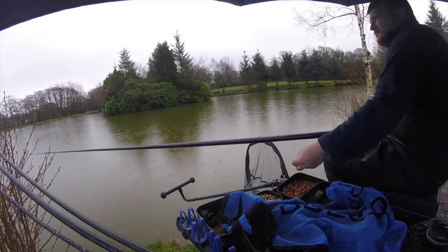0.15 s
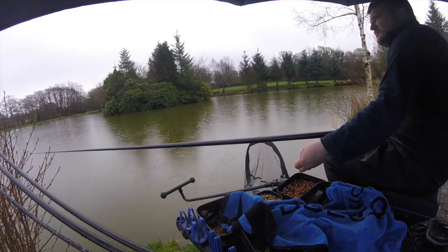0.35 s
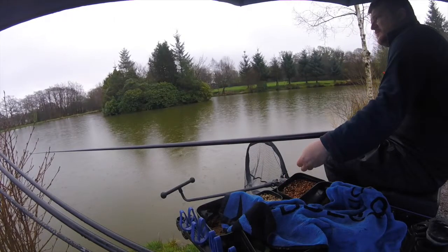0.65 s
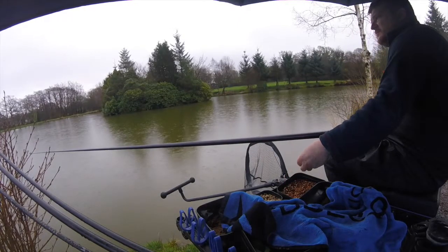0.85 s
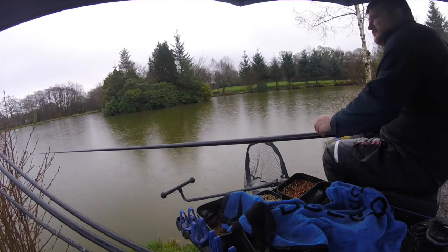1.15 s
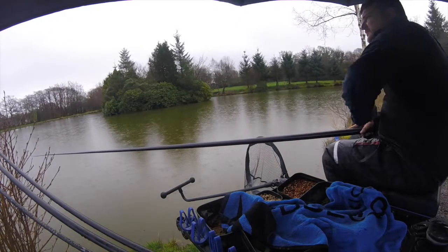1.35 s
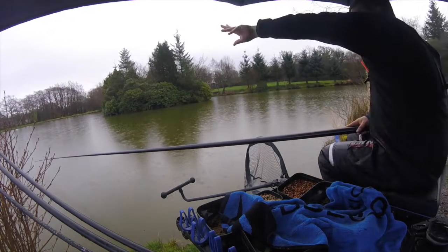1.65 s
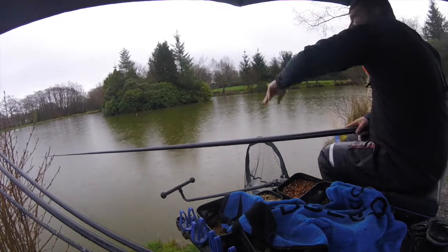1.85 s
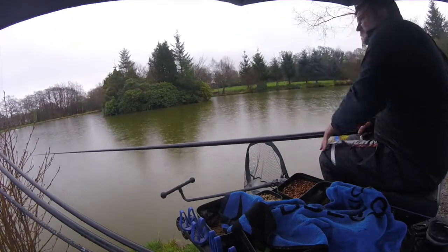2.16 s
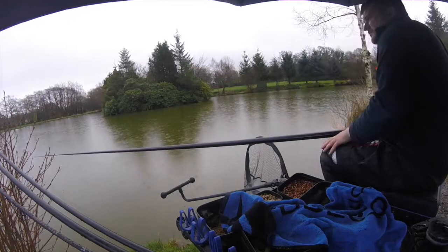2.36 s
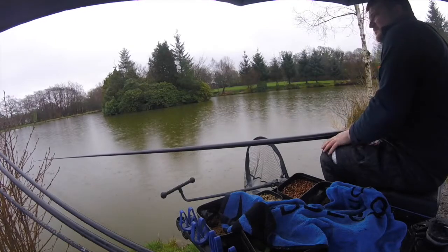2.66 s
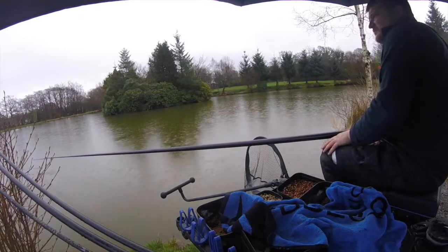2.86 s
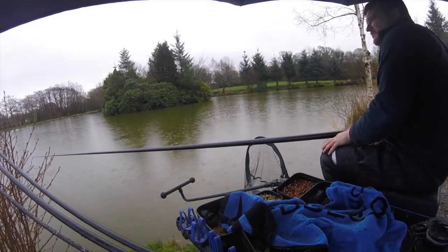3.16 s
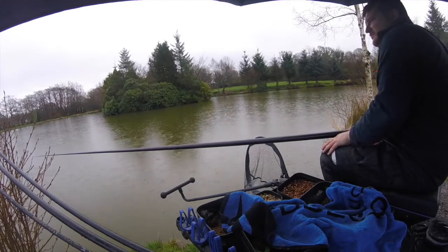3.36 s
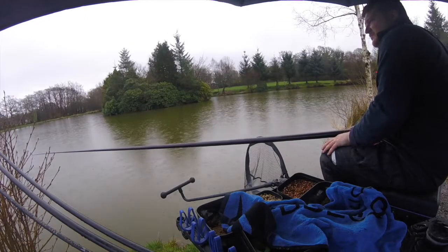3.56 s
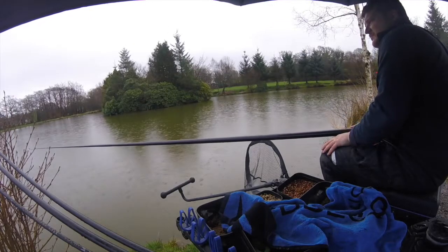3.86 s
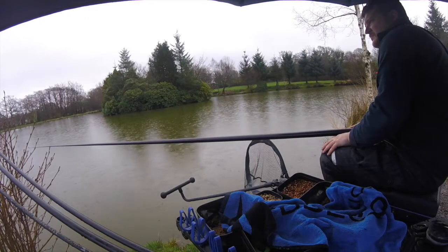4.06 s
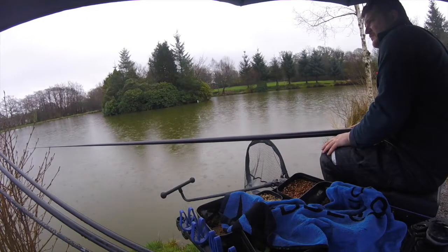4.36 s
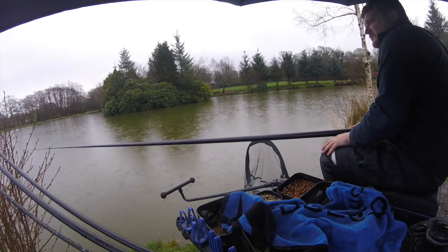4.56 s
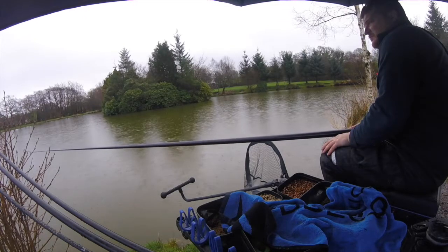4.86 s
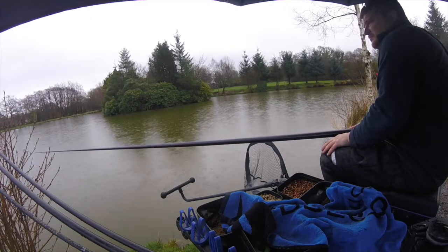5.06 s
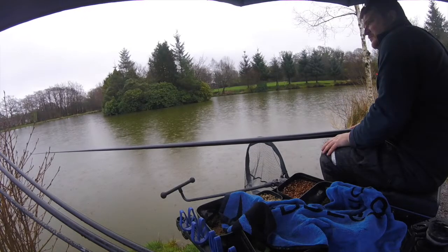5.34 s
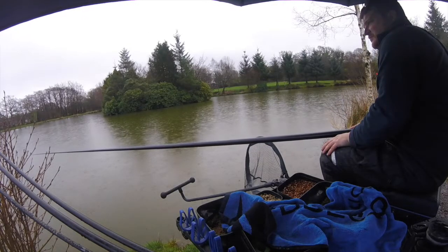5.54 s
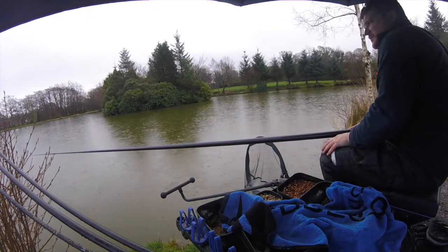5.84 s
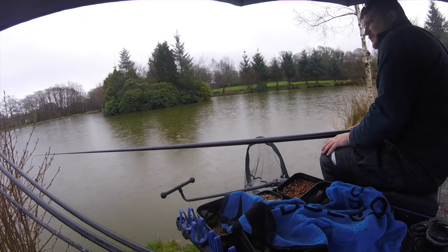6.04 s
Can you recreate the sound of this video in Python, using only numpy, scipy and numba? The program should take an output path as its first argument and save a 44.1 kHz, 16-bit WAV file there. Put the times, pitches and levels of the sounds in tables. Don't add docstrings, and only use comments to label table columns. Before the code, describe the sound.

Under an umbrella beside a lake, steady rain hisses widely and patters on taut cloth, with close drops ringing and spraying. A finch further off to the left sings fast runs of ticks, chips and hoarse dipping notes. Around four to five seconds the rain sinks away and returns as a near bird, almost ahead, repeats piercing phrases with woodland echo. Stereo microphone just below the cloth.

```python
import sys
import numpy as np
from scipy import signal
from scipy.fft import rfft, irfft, next_fast_len
from scipy.io import wavfile
from scipy.ndimage import uniform_filter1d
from numba import njit

SR = 44100
rng = np.random.default_rng(int(sys.argv[2]) if len(sys.argv) > 2 else 0)


def store_wav(level_fs):
    pcm = np.round(np.clip(np.atleast_2d(level_fs), -1, 1) * 32767)
    wavfile.write(sys.argv[1], SR, pcm.T.astype(np.int16))


def how_loud(loudness_db):
    steps = np.asarray(loudness_db, float) / 20
    return 10 ** steps


N = 273420


def level(x, db):
    return x * how_loud(db) / np.sqrt(np.mean(x ** 2))


def curve(table):
    s, *columns = np.transpose(table)
    return [np.interp(np.arange(N) / SR, s, column) for column in columns]


def at(table, hz):
    table_hz, values = np.transpose(table)
    return np.interp(np.log(hz), np.log(table_hz), values)


def pan(db):
    return how_loud(np.array([db, -db]) / 2)


def walk(rate):
    hold = int(SR / rate)
    steps = np.repeat(rng.standard_normal(N // hold + 1), hold)
    return uniform_filter1d(steps, hold)[:N]


def band(x, hz, octaves):
    size = next_fast_len(N)
    f = np.arange(size // 2 + 1) * SR / size + 1
    bell = np.exp(-(np.log2(f / hz) / octaves) ** 2)
    return irfft(rfft(x, size) * bell, size)[..., :N]


def tail(x, t60, gap=0., sparkle=0., flat=False):
    size = SR // 4
    t = np.arange(size) / SR
    decay_db = -60 * np.maximum(t - gap, 0) / t60 + sparkle * walk(150)[:size]
    h = rng.standard_normal((2, size)) * how_loud(decay_db) * (t >= gap)
    if flat:
        spectrum = rfft(h)
        h = irfft(spectrum / uniform_filter1d(np.abs(spectrum), size=5), size) * (t < t60)
    h = h / np.sqrt(np.sum(h ** 2, axis=1, keepdims=True))
    return signal.oaconvolve(x, h, axes=1)[:, :N]


def fade():
    t = np.arange(N) / SR
    out = np.sin(np.interp(t, (2.48, 4.91), [0, np.pi / 2])) ** 2
    back = np.sin(np.interp(t, (4.833, 5.29), [0, np.pi / 2])) ** 2
    return 1 - out + back + how_loud(-50)


# start_s, length_s, level_db
HUM = [
    (0.498, 0.4, -84.5),
    (1.096, 0.57, -90),
    (2.381, 1.1, -83.5),
    (5.397, 0.11, -93),
    (5.776, 0.46, -93),
]


def pump_load():
    idle_db, ramp_s = -92, 0.068
    t = np.arange(N) / SR
    load = how_loud(idle_db)
    for start, length, db in HUM:
        inside = np.minimum(t - start, start + length - t)
        load = load + how_loud(db) * np.clip(inside / ramp_s + 1, 0, 1)
    return load * fade()


def pump():
    hz = 89 + 2.3 * walk(8.0)
    return np.sin(2 * np.pi * np.cumsum(hz) / SR) * pump_load() * how_loud(1.5)


# start_s, level_db
CHORUS = [
    (3.6, -63),
    (4.572, -71.5),
    (5.1, -63.5),
]


def far_chorus():
    smear = band(rng.standard_normal((2, N)), 3240, 0.48)
    heard = np.interp(np.arange(N) / SR, [4.0, 4.45, 4.9, 5.05], [0, 1, 1, 0])
    return level(smear, -0.13) * how_loud(curve(CHORUS)[0] + 2.0 * walk(37)) * heard


# pitch_hz, level_db (per Hz)
HISS = [(18, -40), (36, -10), (88, -24), (140, -21.5), (505, 3), (546, -3.5), (945, -4.5), (1770, -5),
        (2420, 1), (2910, -0.5), (7650, -12), (12300, -5), (15500, -26)]
# pitch_hz, side_minus_mid_db
SIDES = [(60, -4), (110, -3), (200, -1.5), (380, -7.5), (700, 1.5), (1290, 2), (2380, -3.5), (4400, -0.5),
         (8120, 0.5), (15000, 2.5)]
# pitch_hz, left_minus_right_db
LEAN = [(60, 2), (110, 0.5), (200, -4.5), (380, -6), (700, -4), (1290, -9.5), (2380, -3.5), (4400, 2.5),
        (8120, 0), (15000, 2)]


def hiss(treble_db):
    out, low, high = 0, walk(18), walk(10)
    for hz in 32 * 2 ** np.arange(0, 9.1, .5):
        mid, side = band(rng.standard_normal((2, N)), hz, 0.49)
        treble = np.clip(np.log2(hz / 2500) / 3.6, 0, 1)
        db = at(HISS, hz) + treble * treble_db
        db = db + 1.2 * (1 - treble) * low + 2.8 * treble * high + 1.2 * walk(20)
        pair = mid + how_loud(at(SIDES, hz)) * side * np.array([[1], [-1]])
        out = out + how_loud(db) * pair * pan(at(LEAN, hz))[:, None]
    return out


@njit
def grains(s, hz, cycles, left, right):
    out = np.zeros((2, N))
    for k in range(len(s)):
        turn = np.exp((2j * np.pi - np.log(1000) / cycles[k]) * hz[k] / SR)
        z, start = 1 + 0j, int(s[k] * SR)
        for i in range(start, min(N, start + int(cycles[k] / hz[k] * SR))):
            out[0, i] += left[k] * z.imag
            out[1, i] += right[k] * z.imag
            z *= turn
    return out


def patter(count, hz, octaves, cycles, spread_db, pan_db):
    pitch_draw, place_draw = rng.standard_normal((count, 2)).T
    size = how_loud(np.minimum(spread_db * rng.exponential(size=count), 7))
    left, right = size * pan(pan_db * np.clip(place_draw, -1.3, 1.3))
    pitch = np.clip(hz * 2 ** (octaves * pitch_draw), 350, 15000)
    return grains(rng.uniform(0, N / SR, count), pitch, np.full(count, 1. * cycles), left, right)


# start_s, level_db
RAIN = [
    (0.0, -59.5),
    (0.75, -58.5),
    (2.3, -59.5),
    (3.2, -57.5),
    (5.3, -60.5),
    (6.2, -59),
]


def rain():
    db, spray_db = curve(RAIN)[0], 2
    taps = patter(count=3000, hz=1500, octaves=0.63, cycles=5, spread_db=3, pan_db=7)
    ticks = patter(count=3500, hz=8000, octaves=0.75, cycles=11, spread_db=3.5, pan_db=11)
    crisp = patter(count=1800, hz=2800, octaves=0.7, cycles=5.5, spread_db=4, pan_db=7)
    crisp = band(crisp + 0.5 * tail(crisp, .05, flat=True), 2800, 2.2)
    taps = band(taps + 0.35 * tail(taps, 0.093, flat=True), 1760, 2.38) * pan(-0.7)[:, None]
    spray = level(ticks + 1.6 * tail(ticks, 0.063, flat=True), -1.8)
    bed = level(hiss(spray_db), 6.28) + level(taps, 0.057) + level(crisp, -6.0)
    return how_loud(db) * fade() * (bed + how_loud(spray_db) * spray)


def drops(table, cycles, gain_db, pan_db, spray_hz, spray_db, t60, click=1):
    click_hz, click_cycles, click_db = 2630, 2, -1
    s, db, hz = np.transpose(table)
    s = s + 0.00119
    left, right = how_loud(db + gain_db) * pan(pan_db + 0.78 * rng.standard_normal(len(s)))
    hits = grains(s, hz, np.full(len(s), 1. * cycles), left, right)
    touch = np.maximum(hz, click_hz)
    hits = hits + how_loud(click_db) * grains(s, touch, click_cycles * touch / click_hz, left, right) * click
    kicks = np.zeros(N)
    kicks[(s * SR).astype(int)] = how_loud(db + spray_db)
    burst = signal.lfilter([1], [1, -how_loud(-60 / t60 / SR)], kicks) * how_loud(5.47 * walk(500))
    spray = level(band(rng.standard_normal((2, N)), spray_hz, 1.55), 0)
    return hits + burst * spray * pan(pan_db)[:, None]


# start_s, peak_db, ring_hz
TAPS = [(0.127, -40.5, 1750), (0.146, -49, 1890), (0.224, -48.5, 1510), (0.58, -46, 1820),
        (0.621, -50, 1550), (0.888, -41, 1920), (0.977, -44, 1830), (1.184, -44, 1700), (1.292, -47, 1910),
        (1.467, -44.5, 1710), (1.579, -45.5, 1600), (1.689, -44.5, 2060), (1.693, -52, 1510),
        (2.121, -49, 1900), (2.597, -42.5, 1670), (2.731, -48, 1520), (2.84, -41, 1660), (2.964, -46, 1810),
        (3.199, -51, 1748), (3.261, -47.5, 1700), (3.547, -54, 1670), (3.675, -46, 1940),
        (3.748, -50, 2030), (3.885, -56, 1510), (5.096, -44, 1710), (5.563, -42, 2260), (5.631, -40, 1790),
        (5.919, -45.5, 1720), (5.98, -47, 1790), (6.069, -43.5, 1800),
        (0.412, -42, 5100), (1.034, -39.5, 1910), (1.054, -55, 1800), (1.117, -51, 5600),
           (1.974, -49, 1760), (1.997, -47, 1580), (2.065, -43, 1890), (2.151, -46, 1710),
           (2.337, -50, 1490), (2.348, -52, 2300), (2.356, -50, 3600), (2.369, -59, 1320)]
# start_s, peak_db, ring_hz
THUDS = [(0.893, -43.5, 1260), (1.034, -41, 1130), (1.32, -49, 640), (1.46, -52.5, 640), (1.559, -51, 1220),
         (1.824, -50.5, 820), (2.326, -43.5, 674), (2.779, -50, 729), (3.348, -54, 724), (3.68, -55, 1270),
         (5.174, -46.5, 993), (5.421, -45, 651), (5.499, -48, 1130), (6.021, -59, 1230)]
# start_s, peak_db, ring_hz
PATTER = [(0.037, -45, 1080), (0.067, -52, 2510), (0.203, -44, 1700), (0.236, -42, 2830),
          (0.276, -49, 1570), (0.318, -46, 2270), (0.361, -41.5, 1070), (0.417, -42.5, 1770),
          (0.489, -53, 1950), (0.73, -38, 1680), (1.038, -42, 1150), (1.111, -44, 1730), (1.265, -41, 1690),
          (1.332, -45, 2490), (1.437, -52, 2160), (1.587, -42, 1140), (1.7, -43, 2640), (1.771, -48, 2880),
          (1.859, -40, 1820), (1.911, -40.5, 2930), (2.089, -43, 1390), (2.259, -57, 1670),
          (2.331, -48, 1280), (2.342, -47, 1410), (2.362, -48, 1130), (2.377, -51, 2120),
          (2.389, -46.5, 1580), (2.433, -46, 1940), (2.509, -46, 1680), (2.944, -47, 1500),
          (3.044, -42, 2150), (3.065, -51, 1850), (3.119, -53, 1330), (3.311, -50, 1770),
          (3.602, -49, 1510), (3.93, -60, 1360), (3.996, -52.5, 1730), (4.987, -54.5, 2590),
          (5.034, -49, 1120), (5.157, -51, 956), (5.756, -47, 2020), (5.856, -53, 1590), (5.898, -56, 2140),
          (5.938, -45.5, 617), (6.089, -42.5, 865)]
# start_s, peak_db, ring_hz
SPLASHES = [(0.1401, -48, 12800), (0.6694, -38.5, 10200), (0.7706, -48, 12140), (0.8884, -42, 10700),
            (1.0335, -41, 12700), (1.0984, -43.5, 6930), (1.1672, -44, 12300), (1.4353, -39, 6000),
            (1.5549, -43, 13800), (1.9644, -43, 12700), (2.1206, -42, 11800), (2.3504, -46, 7860),
            (2.4513, -38.5, 10700), (2.621, -35.5, 12430), (2.8409, -43, 6760), (3.3139, -43, 12100),
            (3.5733, -45, 11800), (3.7174, -45.5, 7800), (3.9674, -52.5, 12200), (5.1929, -44.5, 6800),
            (5.2398, -43.5, 10500), (5.2922, -41, 12700), (5.356, -45, 7250), (5.4907, -41, 7470),
            (5.5446, -42, 11400), (5.588, -45, 10660), (5.9407, -40.5, 7300), (5.9706, -43, 11900),
            (6.047, -40.5, 6750), (6.1861, -41, 9980),
            (1.458, -45, 11700), (1.7144, -50, 11500), (2.357, -45, 7800), (4.0814, -63, 14700),
         (4.1054, -60, 12200), (4.3564, -68, 12100), (4.4734, -70, 7160), (4.6774, -72, 7160),
         (4.9634, -52.5, 13300), (5.0344, -49, 11600), (5.6904, -44, 12200), (5.9957, -56, 11800)]


def close_drops():
    close = drops(TAPS, 25, 0.94, -3.5, 1800, -8.0, 0.14)
    close = close + drops(THUDS, 11.0, 1.9, -5.0, 1180, -5.0, 0.17)
    close = close + drops(PATTER, 11.3, -3.0, -2.7, 1750, -10.0, 0.1)
    close = close + drops(SPLASHES, 30, .1, 0.71, 12300, -10, 0.16, click=0)
    return signal.sosfilt(signal.butter(2, 300, "high", fs=SR, output="sos"), close)


def whistle(notes, rough_db, glide_db):
    out = np.zeros(N)
    for note in notes:
        s, hz, db = np.transpose(note)
        i = np.arange(int(s[0] * SR), min(N, int(s[-1] * SR)))
        hz = uniform_filter1d(np.interp(i / SR, s, hz), size=60, mode="nearest")
        db = np.interp(i / SR, s, db) + glide_db * np.tanh((np.gradient(hz) / 5) ** 2)
        edge = np.minimum(1, np.minimum(i - i[0], i[-1] - i) / 40)
        out[i] += np.sqrt(2) * edge * how_loud(db) * np.sin(2 * np.pi * np.cumsum(hz) / SR)
    return out * how_loud(rough_db * walk(500))


def sung(song):
    notes = []
    for shape, rows in song:
        for s, pitch, length, db in rows:
            notes.append(np.array(shape) * [length, pitch, 1] + [s, 0, db])
    return notes


# offset_s, pitch_hz, level_db
SEEP = [(0, 5440, -6), (.1, 5460, -2), (.17, 5470, 0), (.29, 5460, -10)]
WHEEZE = [(0, 5950, 2), (.06, 5750, 0), (.16, 5600, -7), (.3, 5550, -11)]
# shape, then rows of start_s, pitch_ratio,
# length_ratio, level_db
FAR = [(SEEP, [(3.37, .998, .95, -66), (3.66, .998, .12, -70), (3.79, .995, .35, -72),
       (4.2, 1.19, .65, -77), (4.45, 1.31, .3, -86), (4.55, .507, 1.2, -79), (4.642, .51, .08, -70),
       (4.714, .51, .08, -70), (4.783, .51, .08, -69)])]
# shape, then rows of start_s, pitch_ratio, length_ratio, level_db
FAR_HOARSE = [(SEEP, [(4.13, 1.215, .55, -67)]), (WHEEZE, [(4.085, 1, 1.1, -75)])]


def far_birds():
    clear = whistle(sung(FAR), 1.5, 0) * how_loud(2.5 * walk(40) - 1)
    hoarse = level(walk(450), 0) * whistle(sung(FAR_HOARSE), 2, 0)
    far = (clear + hoarse) * np.ones((2, 1))
    return .7 * far + .6 * tail(far, .4, flat=True)


# offset_s, pitch_hz, level_db
TICK = [(0, 5940, 0), (.004, 6250, 16.5), (.011, 5500, 9), (.02, 5140, 4), (.024, 5000, -7)]
CHIP = [(0, 4650, -3), (.005, 4500, 9), (.009, 4320, -16), (.013, 5100, 3), (.017, 5300, 7),
        (.023, 5200, -8)]
DIP = [(.017, 4910, -3.5), (.026, 4454, 0.5), (.036, 3750, -1), (.05, 3100, -8), (.054, 3250, -8),
       (.059, 3650, 1), (.067, 4000, 1), (.075, 4200, -4)]
DROP = [(0, 4770, -19), (.004, 3700, 11), (.008, 2750, 8), (.016, 2826, 4), (.026, 2100, -7),
        (.034, 1630, 0)]
GLIDE = [(-.002, 4900, 2), (.003, 3800, 8), (.007, 3050, 6), (.013, 2800, 5), (.021, 2300, -3),
         (.031, 1650, -8)]
HOOK = [(0, 4100, -2), (.006, 5130, -2), (.011, 5350, -3), (.018, 4600, 4), (.024, 3300, -10)]
RASP = [(0, 6290, -6), (.012, 5750, 3.5), (.024, 5000, 8.5), (.034, 4510, 6)]
FLOURISH = [(0, 4130, -6), (.012, 4500, -1), (.028, 4280, -2.5), (.04, 3470, -6), (.062, 3320, -7.5),
            (.075, 4200, -10), (.088, 4600, -10)]
BUZZ = [(0, 6860, -6), (.008, 7000, -1.5), (.016, 6900, -12)]
# start_s, level_db
CHIPS = [(.373, -52), (.436, -53), (.495, -48), (.554, -48)]
DIPS = [(.628, -41.5), (.749, -39), (.868, -40.5), (.983, -40), (1.103, -39), (1.22, -39.5), (1.345, -39),
        (1.467, -41)]
DROPS = [(1.587, -54), (1.649, -57), (1.714, -58), (1.774, -55), (1.841, -51), (1.906, -58), (2.04, -60),
         (2.11, -61)]
LATE_DROPS = [(4.593, -61), (4.663, -57), (4.735, -56), (4.809, -56)]
# start_s, pitch_ratio, length_ratio, level_db
TICKS = [(.062, 0.99, .9, -56), (.182, 1, 1, -53), (.304, 1, 0.55, -51), (4.901, 1.02, .3, -65),
         (4.919, 1.15, .3, -64), (4.931, .9, .4, -63)]
FLOURISHES = [
    (0.073, 1.0, 0.37, -52),
    (2.241, .99, 1, -43),
]
BUZZES = [(.042, 1.04, .8, -55), (.16, 1, .8, -49), (.272, .99, 1.4, -47), (.552, 1, .8, -52)]


def finch_song():
    def run(rows, pitch, length):
        return [(s, pitch, length, db) for s, db in rows]

    clear = [(TICK, TICKS), (CHIP, run(CHIPS, 1.001, 1.0)), (DIP, run(DIPS, 1.001, .94)),
             (DROP, run(DROPS, 1.06, 0.96)), (GLIDE, run(LATE_DROPS, 0.95, 1.0)),
             (HOOK, [(2.524, .99, .99, -45)])]
    rasps = [(s - .008, 1.001, .99, -54) for s, _ in DIPS]
    hoarse = [(RASP, rasps), (FLOURISH, FLOURISHES), (BUZZ, BUZZES)]
    return sung(clear), sung(hoarse)


def finch():
    flutter = level(walk(2200), 0)
    clear, hoarse = finch_song()
    voice = whistle(clear, 3.3, 0) * how_loud(-4.5)
    voice = voice + (.5 + .85 * flutter) * whistle(hoarse, 2.2, 0) * how_loud(1.5)
    voice = voice * how_loud(-5.5) * np.array([[1], [.08]])
    return voice + how_loud(-6) * tail(voice, .3, .002, 2, flat=True)


# turn_s, pitch_hz, stroke_db
TURNS = [
    [(4.7205, 4780, -72), (4.7255, 6120, -63), (4.732, 4340, -59), (4.7375, 6100, -53),
     (4.7445, 4230, -52.5), (4.7515, 5960, -47), (4.757, 4740, -46.5), (4.7655, 5830, -47),
     (4.769, 5120, -49)],
    [(5.072, 4620, -59), (5.076, 5876, -53), (5.084, 3760, -46), (5.0905, 6100, -43), (5.097, 4250, -41.5),
     (5.1037, 6560, -42.5), (5.112, 4340, -39), (5.1168, 5700, -50), (5.118, 5130, -50)],
    [(5.418, 5600, -70), (5.4205, 6290, -47), (5.427, 3856, -50.5), (5.4332, 6070, -43.5),
     (5.4398, 3810, -43), (5.4465, 6600, -40), (5.453, 4580, -38.5), (5.4615, 5800, -37),
     (5.467, 5200, -41)],
    [(5.784, 6320, -68), (5.7855, 6370, -48), (5.7925, 4000, -49), (5.798, 6470, -43), (5.805, 4300, -44),
     (5.8115, 6810, -42), (5.8165, 5050, -40), (5.8255, 6150, -42), (5.8275, 5500, -47)],
    [(6.160, 4500, -66), (6.163, 5200, -56), (6.166, 4520, -55), (6.172, 6280, -50), (6.179, 3790, -46),
     (6.186, 6320, -42.5), (6.192, 4600, -42), (6.199, 5800, -44), (6.202, 5330, -44)],
]
# start_hz, end_hz, length_s, level_db, sag_db, upturn_hz
WARBLES = [
    (5300, 4420, 0.041, -44.5, -8, -60),
    (5200, 4260, 0.041, -38.5, -4, -60),
    (5600, 4760, 0.044, -37.5, -3.5, 220),
    (5800, 4760, 0.046, -37.5, -4.5, 40),
    (5800, 4710, .047, -41, -3, 30),
]


def warbles():
    ease, attack_s, gap_db, stroke_sag_db = 1.7, .0009, -14, -6
    throat_hz, throat_width_hz, throat_db = 5600, 780, -6.5
    break_s, break_db = .002, -11.5
    fall_s, release_s, release_db = .016, .003, -20
    notes, share = [], np.linspace(0, 1, num=160)
    for turns, (start_hz, end_hz, length, db, sag_db, upturn_hz) in zip(TURNS, WARBLES):
        s, hz, push_db = np.transpose(turns)
        early = s[0] + share * (s[-1] - s[0])
        k = np.clip(np.searchsorted(s, early, side="right") - 1, 0, len(s) - 2)
        left = np.clip((s[k + 1] - early) / np.diff(s)[k], 0, 1)
        hz = hz[k + 1] + (hz[k] - hz[k + 1]) * left ** ease
        turn_db = push_db[k] + 2.5 + stroke_sag_db * (1 - left) ** 2
        turn_db = turn_db + gap_db * np.exp((s[k] - early) / attack_s)
        turn_db = turn_db + throat_db * (np.maximum(hz - throat_hz, 0) / throat_width_hz) ** 2
        turn_db = turn_db + break_db * np.exp((early - s[-1]) / break_s)
        t = break_s / 2 + share * length
        fall = end_hz + (start_hz - end_hz) * np.exp(-(t / fall_s) ** 1.5) + upturn_hz * share ** 3
        fall_db = db + break_db * np.exp(-t / break_s) + sag_db * share ** 2
        release = [s[-1] + t[-1] + release_s, end_hz * 0.93, db + release_db]
        notes.append(np.vstack([np.c_[early, hz, turn_db], np.c_[s[-1] + t, fall, fall_db], release]))
    return notes


# offset_s, pitch_hz, level_db
ARCH = [(-.007, 2934, -22), (.002, 3083, -16), (.014, 3265, -5.5), (.031, 3740, 2), (.041, 4023, 4),
        (.050, 4020, 2.5), (.057, 3610, -2.5), (.063, 2940, -8)]
HIGH_ARCH = [(0, 3400, -20), (.012, 3520, -18), (.03, 3700, -8.5), (.046, 4160, -7), (.056, 4280, -4.5),
             (.066, 4000, -5), (.074, 3450, -13), (.08, 2920, -17)]
BOW = [(0, 2410, -3), (.008, 2616, 0), (.017, 2835, 3), (.024, 2790, 2), (.033, 2690, -3)]
LIFT = [(0, 2396, 0), (.008, 2680, 0), (.02, 2817, 2.5), (.029, 2894, 1.5), (.033, 2880, -4)]
# shape, then rows of start_s, pitch_ratio, length_ratio, level_db
NEAR = [
    (ARCH, [(4.884, 0.99, 1.03, -43), (5.233, 0.98, 0.96, -38), (5.584, 1.008, 1.03, -39)]),
    (HIGH_ARCH, [(5.938, 0.99, 0.99, -32)]),
    (BOW, [(4.962, 0.94, 0.9, -56.5), (5.314, 0.98, 1.01, -51)]),
    (LIFT, [(5.667, 1.02, 0.98, -47), (6.032, 1.06, 1.15, -49)]),
]


def songbird():
    voice = whistle(warbles() + sung(NEAR), .4, 3) * how_loud(-1.0)
    voice = voice - 200 * voice ** 3
    voice = voice * pan(1.6)[:, None]
    bank = how_loud(-25) * tail(voice, .1, .17)
    leaves = how_loud(-15) * tail(voice * walk(900), .4, .006, flat=True)
    trunks = how_loud(-8.5) * tail(voice, .42, .012, 3, flat=True)
    return voice + trunks + leaves + bank


def scene():
    distance = pump() + far_chorus() + far_birds()
    return distance + rain() + close_drops() + finch() + songbird()


def band_limit(x):
    return signal.sosfilt(signal.butter(12, 16450, fs=SR, output="sos"), x)


def record(dry):
    cut = signal.ellip(12, .2, 70, 15750, fs=SR, output="sos")
    mix = signal.sosfiltfilt(cut, dry)
    return band_limit(mix)


dry = scene()
out = record(dry)
store_wav(out)
```